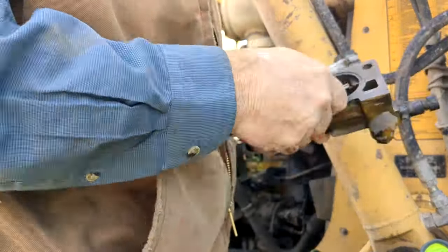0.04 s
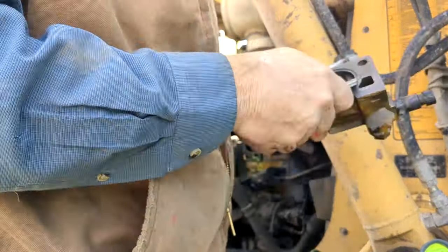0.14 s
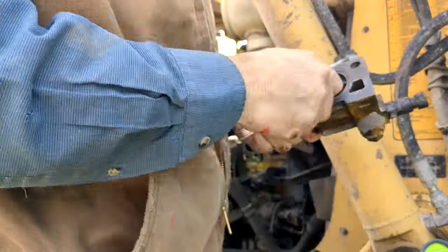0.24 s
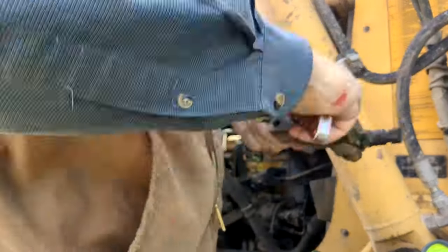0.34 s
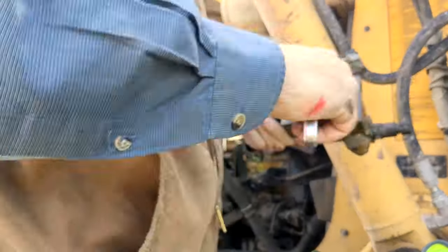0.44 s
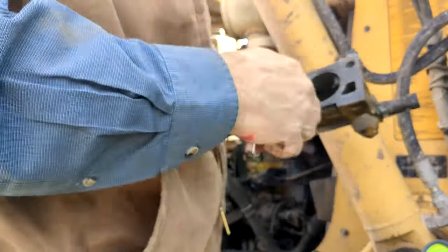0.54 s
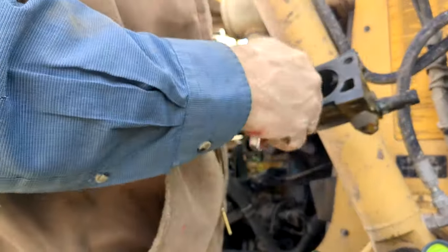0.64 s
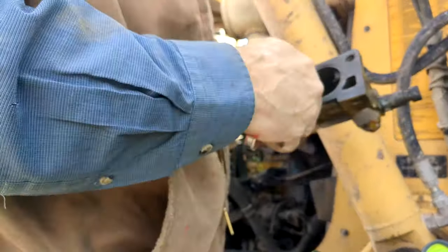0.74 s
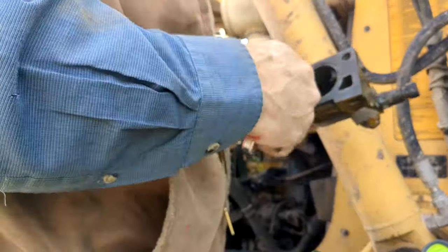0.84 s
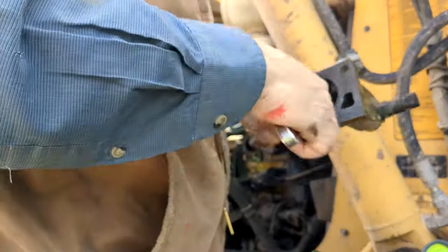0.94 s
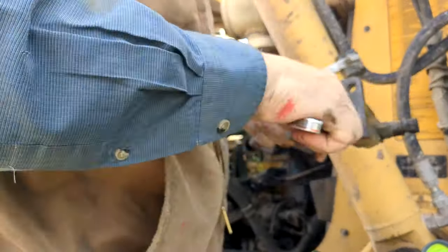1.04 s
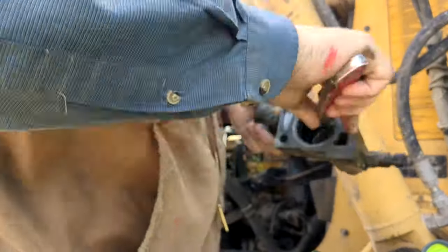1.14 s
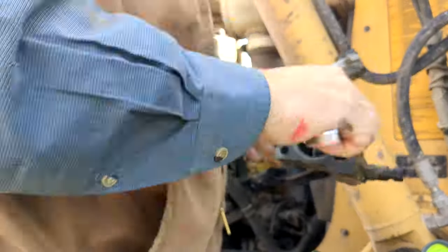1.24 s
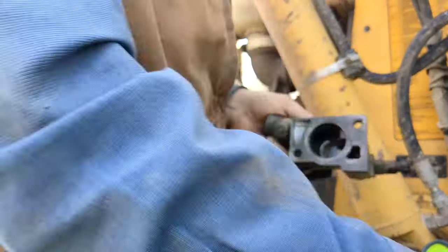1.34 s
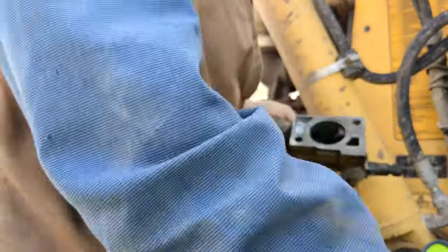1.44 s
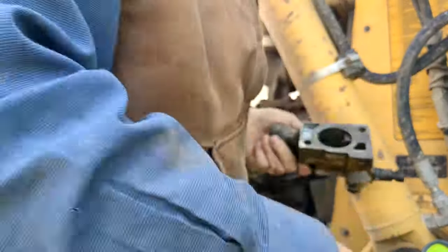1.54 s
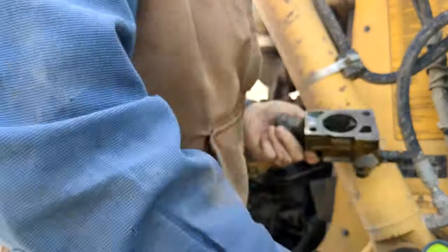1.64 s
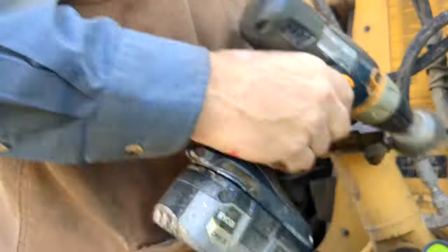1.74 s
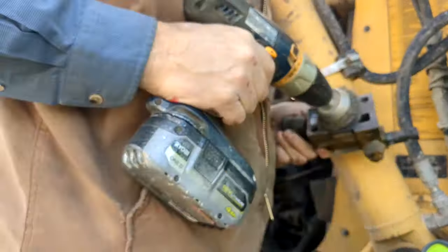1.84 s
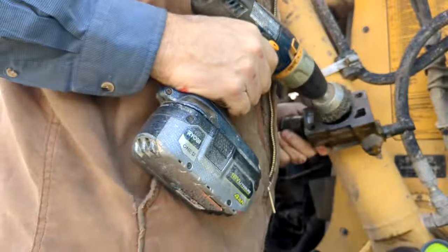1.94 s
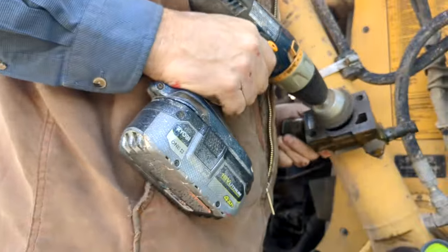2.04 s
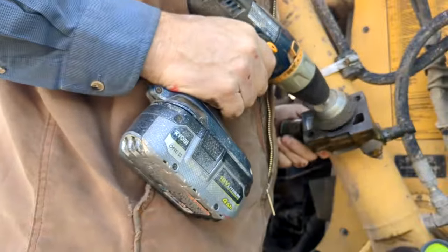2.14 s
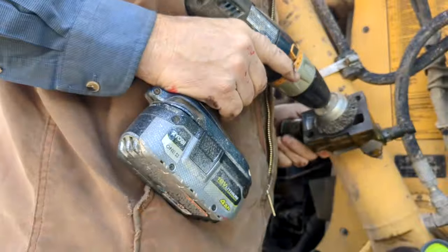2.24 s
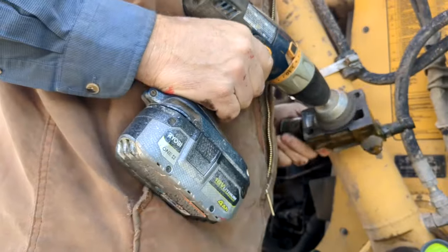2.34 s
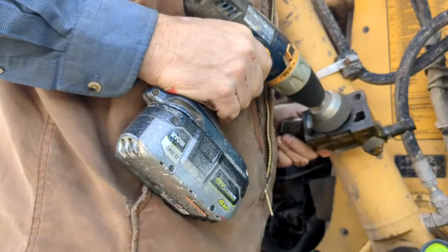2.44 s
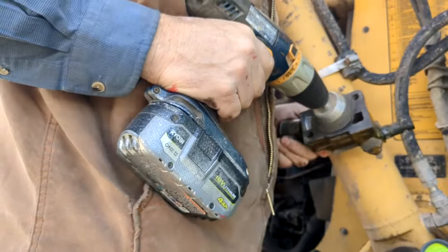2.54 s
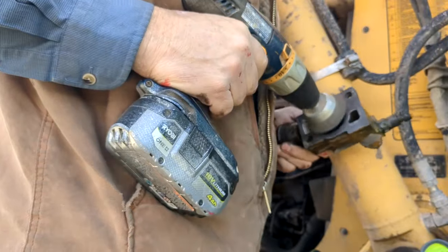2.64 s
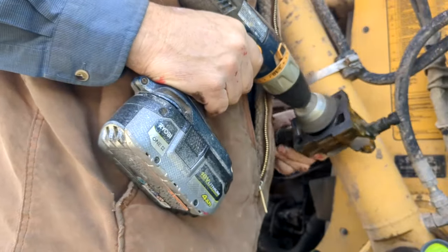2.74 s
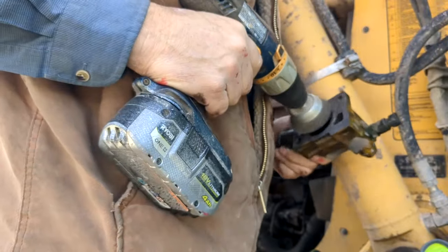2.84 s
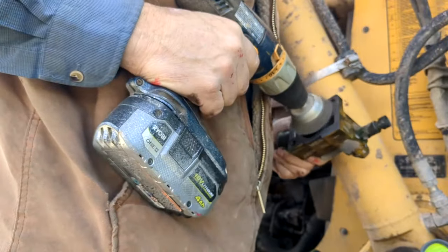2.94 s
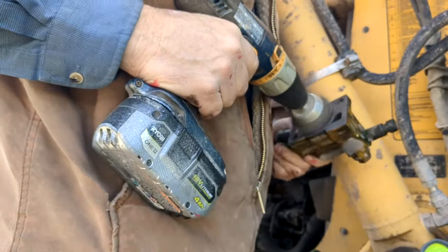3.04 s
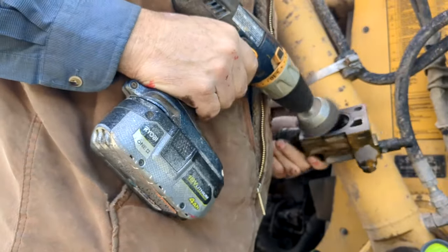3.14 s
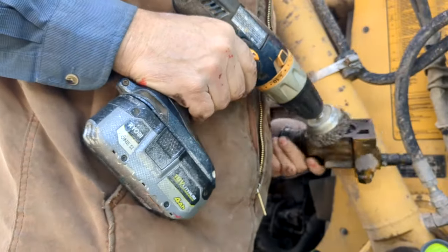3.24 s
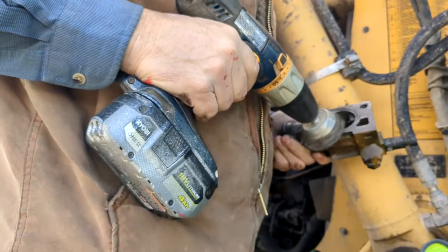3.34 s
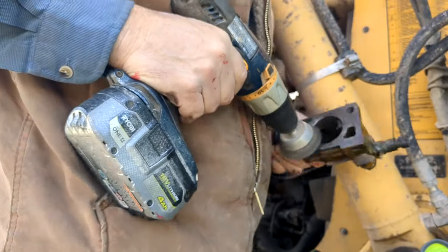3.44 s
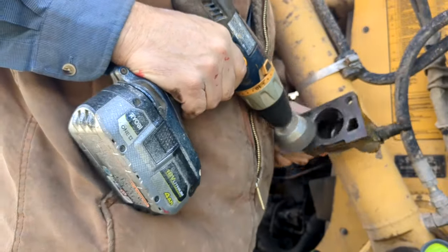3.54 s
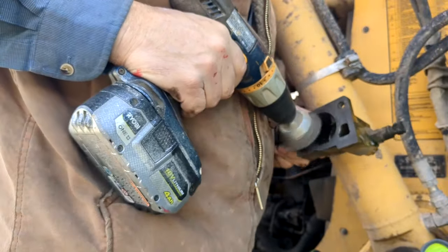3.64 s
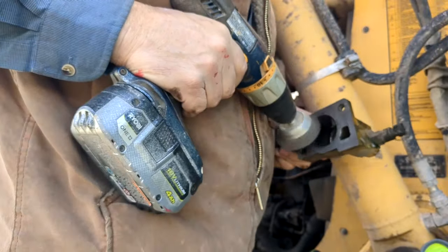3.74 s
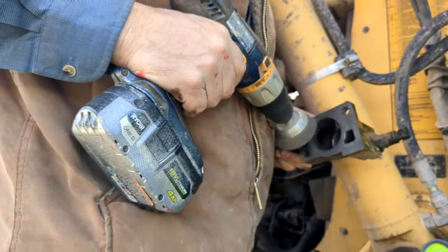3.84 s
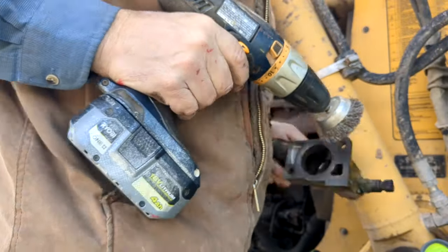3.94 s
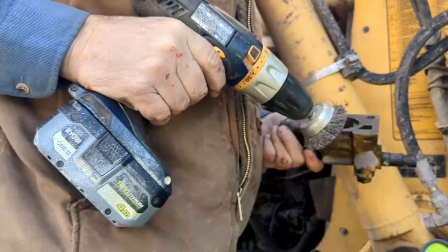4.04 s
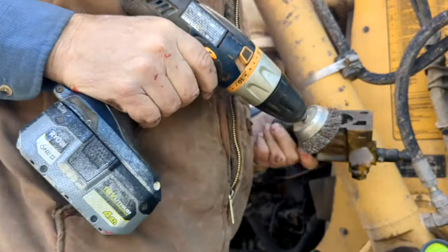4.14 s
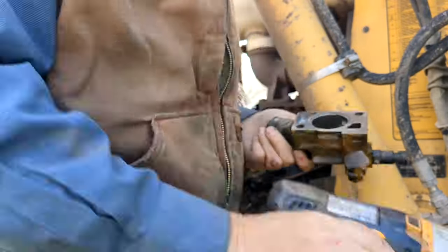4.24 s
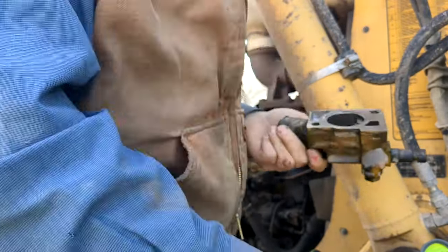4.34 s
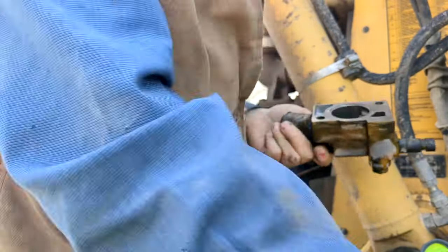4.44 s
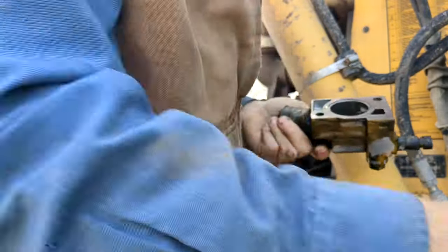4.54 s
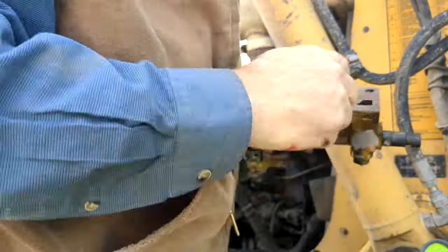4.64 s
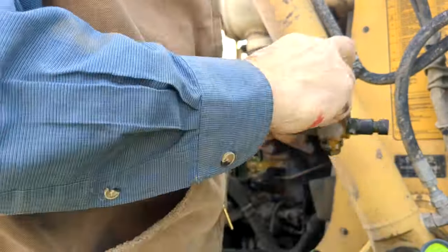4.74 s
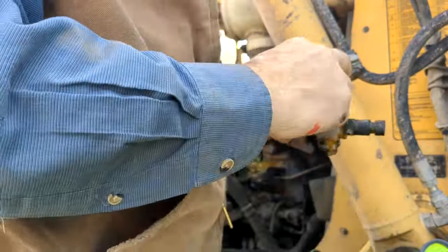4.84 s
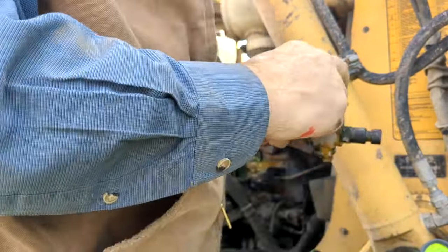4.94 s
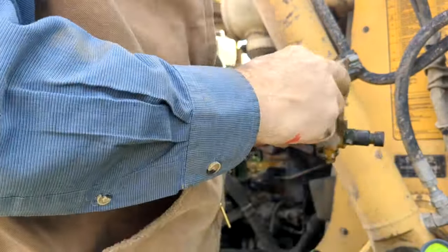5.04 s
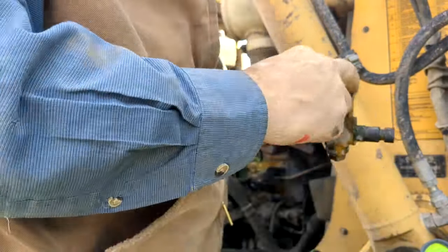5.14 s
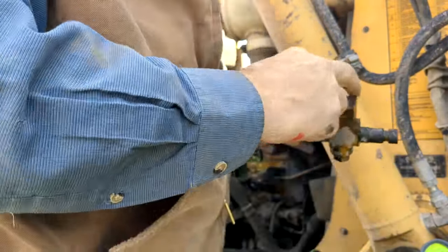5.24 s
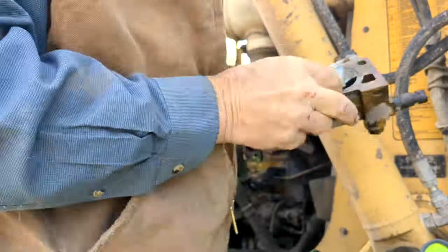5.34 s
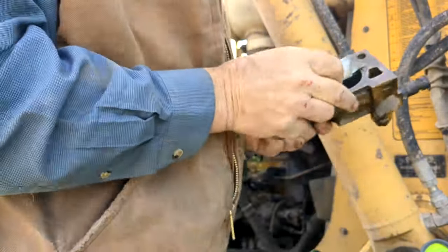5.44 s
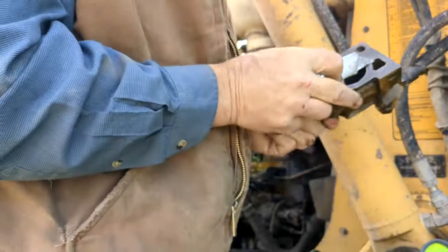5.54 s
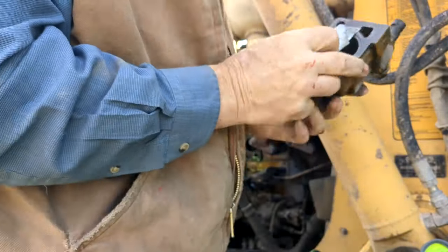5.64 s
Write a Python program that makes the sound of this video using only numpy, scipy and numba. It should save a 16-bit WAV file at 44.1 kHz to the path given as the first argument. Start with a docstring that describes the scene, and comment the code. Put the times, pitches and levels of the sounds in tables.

```python
"""A work spot open to the wind, a phone microphone close to the tool. A cordless drill spins a wire
cup brush against a cast metal part in three short bursts: the motor sings on multiples of its shaft
turn, the gears growl, the bristles rasp; brief thin tones sound, mostly in the first burst. Before
and after, hands knock and scrape tool and part. Underneath lie a low wavering hum, wind rumble,
cloth rustle and a thin hiss; three faint rising chirps come as the work ends."""
import sys
import numpy as np
from scipy import signal
from scipy.fft import rfft, irfft, next_fast_len
from scipy.io import wavfile
from scipy.ndimage import uniform_filter1d
from numba import njit

SR = 44100
rng = np.random.default_rng(int(sys.argv[2]) if len(sys.argv) > 2 else 0)


def master(y):
    """Save y as 16-bit WAV."""
    cut = np.clip(np.atleast_2d(y).T, -1, 1)
    pcm = np.round(cut * 32767)  # scale
    wavfile.write(sys.argv[1], SR, pcm.astype(np.int16))


N = 250488
T = np.arange(N) / SR


def undb(db):
    return 10 ** (np.asarray(db) / 20)


def unit(x):
    """Scale to rms 1."""
    return x / np.sqrt(np.mean(x ** 2))


def curves(rows):
    """The value columns of a (t/s, value, ..) table at every sample."""
    times, *columns = np.transpose(rows)
    return [np.interp(T, times, column) for column in columns]


def colour(x, spectrum):
    """Shape a signal by (f/Hz, level/dB) points; rms 1."""
    hz, db = np.transpose(spectrum)
    size = next_fast_len(len(x))
    log_hz = np.log(np.maximum(np.arange(size // 2 + 1) * SR / size, 1))
    gain = undb(np.interp(log_hz, np.log(hz), db, left=-80, right=-80))
    return unit(irfft(rfft(x, size) * gain, size)[:len(x)])


@njit
def bandpass(x, hz, width_hz):
    """Band-pass whose centre may move every sample, gain 1 at the centre."""
    y, band, low = np.empty(len(x)), 0., 0.
    for i in range(len(x)):
        g, damping = np.tan(np.pi * hz[i] / SR), width_hz / hz[i]
        v = (band + g * (x[i] - low)) / (1 + g * (g + damping))
        band, low, y[i] = 2 * v - band, low + 2 * g * v, damping * v
    return y


def wander(rate):
    """Random levels held 1 / rate s and smoothed twice; spread near 1."""
    hold = int(SR / rate)
    steps = np.repeat(rng.standard_normal(N // hold + 1), hold)
    return 1.395 * uniform_filter1d(uniform_filter1d(steps, hold), hold)[:N]


def grit(scatter_db):
    """Dense tiny impacts of uneven size."""
    return rng.standard_normal(N) * undb(scatter_db * np.minimum(rng.exponential(size=N), 4))


# Low hum at the microphone: t/s, level/dB
HUM_LEVEL = [(0.0, -60), (0.38, -73), (0.41, -59), (0.63, -75), (1.09, -72), (1.19, -55), (1.37, -80.5),
             (1.47, -45.5), (1.68, -73), (1.82, -78), (1.99, -40), (2.06, -37), (2.12, -34.5), (2.37, -36),
             (2.44, -42), (2.56, -58), (2.66, -35), (2.72, -44), (2.93, -48.5), (3.02, -34), (3.16, -59),
             (3.46, -48.5), (3.7, -51.5), (3.76, -62), (3.89, -42), (4.18, -62.5), (4.4, -47.5),
             (4.75, -66.5), (5.31, -66.5), (5.43, -34), (5.68, -33)]


def hum(hz=70.2):
    """One low tone that wavers in pitch and level."""
    phase = 2 * np.pi * np.cumsum(hz + 0.66 * wander(4.8)) / SR
    return np.sqrt(2) * np.sin(phase) * undb(curves(HUM_LEVEL)[0] + wander(12))


# Wind at the microphone: t/s, relative level/dB
WIND_LEVEL = [(0.0, -53), (0.17, -69), (0.6, -76), (1.1, -80), (1.19, -61), (1.37, -85), (1.47, -67),
              (1.6, -64), (1.82, -83), (2.06, -46.5), (2.99, -54.5), (3.015, -34.5), (3.04, -47),
              (3.3, -55.5), (3.55, -45.5), (3.76, -56), (3.89, -44.5), (4.1, -62), (4.4, -52), (4.7, -66.5),
              (4.75, -75.5), (5.31, -73), (5.43, -43), (5.68, -48)]
# Spectrum of its rumble: f/Hz, level/dB
WIND_SPECTRUM = [(15, -11.5), (30, 0.5), (50, 1.5), (120, 1), (220, -7.5), (400, -20), (700, -27)]


def wind():
    """Deep noise that swells unevenly with the gusts."""
    rumble = colour(rng.standard_normal(N), WIND_SPECTRUM)
    return rumble * undb(curves(WIND_LEVEL)[0] + 4 + 2.8 * wander(9.6))


# Cloth and fingers near the microphone: t/s, relative level/dB
CLOTH_LEVEL = [(0.0, -69.5), (0.6, -68.5), (0.95, -71.5), (1.3, -70), (1.85, -66.5), (2.2, -52.5),
               (2.33, -54), (3.26, -64.5), (3.35, -65), (3.97, -54.5), (4.45, -50), (4.76, -60),
               (4.79, -69.5), (4.941, -63.5), (5.0, -53), (5.1, -58.5), (5.17, -64.5), (5.34, -62.5),
               (5.54, -53.5), (5.68, -55)]
# Their spectra before the first burst and from then on: f/Hz, level/dB
EARLY_CLOTH_SPECTRUM = [(300, -30), (600, -15.5), (1200, -17), (1550, -6.5), (1850, 2), (2300, -10.5),
                        (3200, -11), (5000, -18.5), (7000, -27)]
LATE_CLOTH_SPECTRUM = [(300, -31.5), (550, -19.5), (800, -5), (1000, 1), (1500, 1.5), (2200, -2),
                       (3300, -6.5), (4500, -15), (7000, -33)]


def cloth(tone_hz=932):
    """Cloth and fingers rub in fine grains; a very faint tone rises and falls with them."""
    level_db = curves(CLOTH_LEVEL)[0]
    grains = grit(0.9)
    early, late = colour(grains, EARLY_CLOTH_SPECTRUM), colour(grains, LATE_CLOTH_SPECTRUM)
    rustle = np.where(T < DRILL_BURSTS[0][0], early, late) * undb(level_db + 1.5 + 2 * wander(45))
    tone = np.sqrt(2) * np.sin(2 * np.pi * tone_hz * T) * undb(-83 + .5 * (level_db + 65))
    return rustle + tone


# Background hiss: t/s, level/dB
HISS_LEVEL = [(0.0, -68.5), (0.5, -72.5), (0.75, -76), (1.2, -69.5), (3.3, -67.5), (4.45, -64.5),
              (4.9, -71), (5.68, -66.5)]
# Its spectrum: f/Hz, level/dB
HISS_SPECTRUM = [(3000, -25), (4000, -6), (5200, -8), (6800, 0), (8000, -9), (10000, -5), (13000, -12),
                 (16500, -18)]


def hiss():
    """Faint, grainy treble that flickers."""
    return colour(grit(2.5), HISS_SPECTRUM) * undb(curves(HISS_LEVEL)[0] + 1.4 * wander(40))


# Dull modes of the hand-held part and the drill body: f/Hz, level/dB, t60/s
BODY_MODES = [(230, -10, 0.029), (333, 0, 0.016), (410, 4, 0.0074), (683, -3.5, 0.018), (968, -16, 0.033)]
# Spectrum of the tick on contact: f/Hz, level/dB
TICK_SPECTRUM = [(4000, -24), (5000, 3.5), (6800, -2), (8200, -9), (10200, 3.5), (12500, -8), (16500, -1)]


def knock(start, db, ring_hz, fall_s, thud_db, tick_db, push_hz, rise_s=0.004):
    """One contact, a short swell of noise: a pitched ring, a thud in the body modes, a tick on top."""
    t = np.arange(3600) / SR
    ring_noise, push_noise, tick_noise = rng.standard_normal((3, len(t)))
    band = lambda x, hz, width_hz: bandpass(x, np.full(len(t), float(hz)), width_hz)
    to_peak = lambda x: x / np.max(np.abs(x))
    # a rounded swell with a weak tail from nearby steel
    rise = np.sin(np.pi / 2 * np.minimum(t / rise_s, 1)) ** 2
    age = np.maximum(t - rise_s, 0) / fall_s
    swell = rise * (np.exp(-age ** 2) + 0.029 * np.exp(-age / 2))
    scrape = ring_noise
    for _ in range(3):
        scrape = band(scrape, 2000, 2600.)
    ring = swell * (unit(scrape) + 2.8 * unit(band(ring_noise, ring_hz, 310.)))
    # the push has no steady part, so nothing booms below the body modes
    low_cut = signal.butter(2, 200, "high", fs=SR, output="sos")
    push = band(signal.sosfilt(low_cut, push_noise * swell), push_hz, 250.)
    body = sum(undb(level) * np.sin(2 * np.pi * hz * t) * 1000 ** (-t / t60)
               for hz, level, t60 in BODY_MODES)
    thud = signal.fftconvolve(push, body)[:len(t)]
    tick = swell * colour(tick_noise, TICK_SPECTRUM)
    contact = to_peak(ring) + undb(thud_db) * to_peak(thud) + undb(tick_db) * to_peak(tick)
    onset = int((start - .002) * SR)
    return np.pad(undb(db) * contact, (onset, N))[:N]


# Light handling, close up: t/s, ring level/dB, ring f/Hz, fall/s, tick re ring/dB
FINGER_CLICKS = [(0.2292, -45, 2220, 0.0035, -2), (0.245, -41.5, 2450, 0.0073, 7),
                 (0.253, -38, 2190, 0.0047, -5), (0.2875, -39, 1710, 0.0065, 3),
                 (0.317, -45, 1950, 0.0066, -13), (0.338, -36, 2900, 0.01, -4),
                 (0.377, -44, 3020, 0.0069, -6), (0.3865, -38, 3160, 0.018, -2),
                 (0.393, -41, 3140, 0.0089, -14), (0.4022, -30, 3230, 0.0075, -11),
                 (0.4138, -29.5, 3500, 0.0037, -15), (0.975, -40.5, 2640, 0.012, 2),
                 (1.017, -46.5, 2030, 0.0063, 5.5), (1.054, -47, 1910, .005, -4),
                 (1.077, -41.5, 2200, 0.014, -7), (1.09, -39.5, 2180, 0.0089, -4),
                 (1.114, -36, 2160, 0.0065, -1), (1.1187, -23.5, 2350, 0.0043, -4.5),
                 (1.1401, -23, 2370, 0.01, -3), (1.1539, -19, 3370, 0.017, -4),
                 (1.166, -15, 3300, 0.0052, -4.5), (1.263, -39, 2120, 0.0045, -2),
                 (1.4337, -20, 2400, 0.0078, -17), (1.608, -32, 1760, .0042, -40),
                 (1.635, -44, 1865, 0.0094, -22), (1.6788, -41, 1760, 0.0086, -10),
                 (1.695, -26.5, 2010, 0.007, -3), (1.7764, -56, 1870, 0.0071, 11.5),
                 (1.843, -44, 2370, 0.0053, 2.5), (1.877, -24, 3440, .0032, -20),
                 (2.227, -35.5, 2500, 0.0043, 2), (3.3413, -36, 2200, 0.0089, -10),
                 (4.14, -41.5, 2900, 0.0066, -28), (4.1796, -38.5, 1120, 0.0085, -22),
                 (4.504, -30, 1550, 0.0076, -14), (4.5394, -34, 2060, 0.006, -7),
                 (4.8531, -37, 1986, 0.0056, -32), (4.991, -40, 3760, .0052, -26),
                 (5.0336, -36.5, 2050, 0.0069, -8), (5.185, -42, 1760, .005, -12),
                 (5.218, -36, 2950, 0.0066, -1), (5.259, -41, 3510, .0056, -1),
                 (5.2731, -27, 3250, 0.0044, -10.5), (5.296, -46, 1600, .004, -9),
                 (5.3227, -43.5, 2020, 0.0063, -1.5), (5.378, -44.5, 2000, .005, -10),
                 (5.5358, -35.5, 3500, 0.004, -12), (5.6009, -33.5, 2350, .0062, -5),
                 (5.668, -35.5, 2500, 0.006, -9)]


def clicks():
    """Fingers and metal tap and scrape, barely stirring the body modes."""
    return sum(knock(start, db, hz, fall_s, thud_db=-23.5, tick_db=tick_db, push_hz=950)
               for start, db, hz, fall_s, tick_db in FINGER_CLICKS)


# Short thin tones, mostly during the first burst: t/s, length/s, f/Hz, level/dB
BRIEF_TONES = [(1.452, 0.0084, 5040, -32), (1.887, 0.017, 3600, -19.5), (1.888, .028, 4960, -29.5),
               (1.895, 0.019, 1880, -26), (1.897, 0.025, 1020, -32.5), (1.898, .016, 8100, -33),
               (1.942, 0.1, 6930, -33), (2.002, 0.041, 3650, -25), (2.003, 0.023, 1290, -27),
               (2.006, 0.019, 2090, -17.5), (2.065, 0.03, 6140, -23), (2.07, .03, 5020, -24),
               (2.071, 0.029, 2850, -14), (2.077, 0.013, 3700, -30), (2.11, 0.033, 4840, -25),
               (2.112, 0.021, 2680, -11.5), (2.115, .016, 1870, -15), (2.125, .039, 6250, -33),
               (4.379, 0.016, 11460, -28)]


def brief_tones():
    """Each tone swells and fades at a steady pitch, its level fluttering."""
    out = np.zeros(N)
    for start, length, hz, db in BRIEF_TONES:
        progress = np.clip((T - start) / length, 0, 1)
        out += undb(db) * np.sin(np.pi * progress ** 1.1) * np.sin(2 * np.pi * hz * T)
    return out * undb(2 * wander(90))


# Heavy handling, close up: t/s, ring level/dB, ring f/Hz, fall/s, thud re ring/dB, push f/Hz
DRILL_CLUNKS = [(1.4545, -16, 1290, 0.0071, 5.5, 390), (1.466, -30.5, 1360, 0.021, 7, 215),
                (1.4822, -21.5, 1370, .01, 12, 298), (1.499, -33.5, 902, 0.0077, -2, 258),
                (1.513, -37.5, 2570, 0.0032, 9.5, 275), (4.3134, -14, 1423, 0.0047, 1.5, 577),
                (4.3219, -16, 1050, 0.019, -1, 278), (4.34, -7, 1020, 0.007, -5, 980),
                (4.351, -23, 895, 0.007, 0, 515), (4.365, -19, 1030, 0.0098, 4, 1040),
                (4.3789, -20.5, 1000, 0.0083, 4.5, 570), (4.3878, -22, 1360, 0.0071, -6, 256),
                (4.4834, -25, 2410, 0.0052, -0.5, 490), (4.4929, -26, 1370, .0069, -13, 614),
                (4.5222, -30, 1060, 0.0084, -6, 291)]


def clunks():
    """The drill body thuds as it is picked up and laid down."""
    return sum(knock(start, db, hz, fall_s, thud_db, tick_db=-26, push_hz=push_hz)
               for start, db, hz, fall_s, thud_db, push_hz in DRILL_CLUNKS)


# Weaker motor tones: multiple of the shaft turn, level re shaft tone/dB, flutter/dB
SHAFT_OVERTONES = [(2, -4, 1.5), (3.07, -14, 4.0), (4.97, -8, 4.0), (7, -11, 4.0), (9.03, -11, 4.0)]
# Blurred upper tones at full speed: multiple of the shaft turn, level re slot whine/dB
UPPER_WHINE = [(18, -23), (26, -23), (28.6, -17), (29.17, -15)]


def motor(set_hz, hz, turn, pull_db, shaft_trim_db, overtone_trim_db):
    """The shaft sings with its overtones; the slots whine at 12 times its speed."""
    def tone(multiple, db, flutter_db):
        return np.sqrt(2) * undb(db + flutter_db * wander(70)) * np.sin(multiple * turn + multiple)

    def blur(multiple, width_hz):
        once = bandpass(rng.standard_normal(N), multiple * hz, width_hz)
        return unit(bandpass(once, multiple * hz, width_hz))

    # the tones sag as load slows the shaft; below the knee the shaft tone fades fast
    free_hz, knee_hz = 329, 291
    sag = 1 - np.exp(-np.maximum(free_hz - set_hz, 0) / 15)
    fade_db = 0.8 * np.maximum(knee_hz - set_hz, 0)
    shaft_db = -26.5 + shaft_trim_db - 1.5 * sag - fade_db + 0.12 * pull_db
    whine_db = -16.5 - 8 * sag + pull_db
    shaft = tone(1, shaft_db, flutter_db=1.9)
    for multiple, db, flutter_db in SHAFT_OVERTONES:
        shaft += tone(multiple, shaft_db + overtone_trim_db + db, flutter_db)
    full_speed = np.clip((hz - 315) / 8, 0, 1)
    upper = full_speed * sum(undb(db) * blur(multiple, 50.) for multiple, db in UPPER_WHINE)
    haze = undb(whine_db) * (undb(-11) * blur(12, 300.) + upper)
    return shaft + tone(12, whine_db, flutter_db=1.5) + haze


def gears(shaft_hz, multiple=5.44):
    """The gears growl in a gritty band that follows the shaft speed."""
    return unit(bandpass(grit(5.7), multiple * shaft_hz, 290.)) * undb(-6.5 + 2 * wander(90))


# Brush on the casting, close up; spectra of mid rasp, scratch and bristle sizzle: f/Hz, level/dB
RASP_SPECTRUM = [(100, -47.5), (200, -19), (400, -13), (800, -4.5), (1200, -0.5), (1650, 3.5), (2100, 1),
                 (2400, -13.5), (2800, -31)]
SCRATCH_SPECTRUM = [(1700, -33), (2000, -5.5), (2300, 0.5), (3000, 1), (3600, -3.5), (4200, -3),
                    (4900, -4.5), (5300, -20), (6000, -41.5)]
BRISTLE_SPECTRUM = [(4500, -44.5), (5100, -9.5), (5500, -10), (6500, -9), (8200, -14.5), (8900, -6),
                    (9400, -1.5), (10200, -3), (11100, -9), (11600, -12.5), (13000, -15), (14000, -16.5),
                    (14800, -14.5), (15250, -13), (15600, -2.5), (16500, -12)]
# Brief dips in the rasp: t/s, level/dB
RASP_DIPS = [(1.906, -14), (2.016, -11), (2.081, -9), (2.123, -9), (2.63, -5), (3.762, -5)]


def wire_brush(turn, growl, brush_db, rasp_trim_db, planet_multiple=.571, dip_s=.015):
    """Wire tips strike the casting in three bands of grit; the gear growl rides in the rasp."""
    rasp = colour(grit(2.7), RASP_SPECTRUM) * undb(wander(150))
    rasp = (rasp + growl) * undb(brush_db - 4.5 + rasp_trim_db)
    scratch = colour(grit(1.3), SCRATCH_SPECTRUM) * undb(brush_db - 3.5 + 0.5 * wander(85))
    bristles = colour(grit(2.6), BRISTLE_SPECTRUM) * undb(brush_db - 7.5 + wander(71))
    # planet wheels passing the ring gear throb through the rasp
    throb = np.exp(0.13 * np.sin(planet_multiple * turn) + 0.09 * np.sin(turn))
    dip_db = sum(db * np.exp(-((T - centre) / (dip_s / 2)) ** 4) for centre, db in RASP_DIPS)
    return undb(dip_db) * (rasp + scratch) * throb + undb(0.39 * dip_db) * bristles


# The three bursts: from t/s, to t/s, rasp trim/dB, shaft tone trim/dB, overtone trim/dB
DRILL_BURSTS = [(1.882, 2.24, -2.5, 2.5, -3), (2.33, 3.25, 0.5, -1.2, 1), (3.358, 3.976, 0.5, 1.1, -4)]
# Motor shaft, one list a burst: t/s, turning f/Hz, pull re full pull/dB
SHAFT_SPEED = [
    [(1.87, 199.8, -35), (2.03, 225.5, -34.5), (2.06, 302, -24), (2.12, 312, -31), (2.17, 309, -22.5),
     (2.2, 245, -34.5), (2.215, 224, -49)],
    [(2.33, 223.5, -16), (2.342, 254.2, -8), (2.365, 316.8, 2), (2.38, 327.5, -1), (2.5, 327.7, -3.5),
     (2.58, 320.7, -5), (2.7, 329.5, -1), (3.1, 324.9, -0.5), (3.18, 331.7, 0), (3.2, 303.6, -0.5),
     (3.218, 242.6, 6), (3.23, 226, -20)],
    [(3.37, 254.5, -24.5), (3.405, 290.3, -2.5), (3.43, 290, -4), (3.44, 267.6, 2), (3.457, 269, 2.5),
     (3.468, 303.8, 0.5), (3.482, 327.6, 2.5), (3.5, 328.1, 4.5), (3.565, 323.4, 2), (3.65, 328.4, 1),
     (3.89, 326.7, 1), (3.905, 321.2, -5), (3.925, 319.4, 3), (3.94, 304.3, -37), (3.96, 268.4, -48)],
]
# Brush on the metal, one list a burst: t/s, relative level/dB
BRUSH_LEVEL = [
    [(1.868, -73), (1.874, -49), (1.882, -22.5), (1.897, -20.5), (1.925, -19.5), (2.03, -19.5),
     (2.045, -15), (2.082, -13), (2.198, -13.5), (2.22, -51), (2.23, -45), (2.245, -62)],
    [(2.325, -65.5), (2.337, -25), (2.35, -17.5), (2.363, -12.5), (2.4, -14), (2.631, -13), (3.181, -13),
     (3.219, -19.5), (3.233, -45.5), (3.25, -69)],
    [(3.358, -67), (3.37, -21), (3.39, -20), (3.4, -11), (3.436, -15), (3.478, -13), (3.918, -12.5),
     (3.93, -16.5), (3.946, -17.5), (3.962, -50), (3.975, -51)],
]


def drill(stall_db=-19.5):
    """One shaft drives motor tones, gears and brush; below stall_db the tones die with the brush."""
    set_hz, pull_db = curves(np.concatenate(SHAFT_SPEED))
    brush_db = curves(np.concatenate(BRUSH_LEVEL))[0]
    in_burst = np.array([(T >= start) & (T <= end) for start, end, *_ in DRILL_BURSTS], float)
    running = uniform_filter1d(in_burst.sum(axis=0), size=220)
    rasp_trim_db, shaft_trim_db, overtone_trim_db = np.array(DRILL_BURSTS)[:, 2:].T @ in_burst
    hz = set_hz * (1 + 0.0027 * wander(40))  # the load on the brush makes the speed tremble
    turn = 2 * np.pi * np.cumsum(hz) / SR
    tones = motor(set_hz, hz, turn, pull_db, shaft_trim_db, overtone_trim_db)
    tones *= undb(np.minimum(brush_db - stall_db, 0))
    return running * (tones + wire_brush(turn, gears(hz), brush_db, rasp_trim_db))


# Faint chirps in the background: t/s, length/s, from f/Hz, to f/Hz, level/dB
RISING_CHIRPS = [(3.97, .03, 2600, 3150, -45), (4.055, .025, 3600, 4300, -51),
                 (4.735, .04, 2300, 3000, -52)]


def chirps():
    """Short whistles that glide upward."""
    out = np.zeros(N)
    for start, length, from_hz, to_hz, db in RISING_CHIRPS:
        progress = np.clip((T - start) / length, 0, 1)
        hz = from_hz + (to_hz - from_hz) * progress
        out += undb(db) * np.sin(np.pi * progress) * np.sin(2 * np.pi * np.cumsum(hz) / SR)
    return out


def scene():
    """All that reaches the one microphone beside the work."""
    background = hum() + wind() + cloth() + hiss()
    return (background + clicks() + brief_tones() + clunks() + drill() + chirps())[None]


def record(dry, top_hz=15700):
    """The phone, close to the tool, rounds the loudest peaks and cuts the top."""
    rounded = np.tanh(.95 * dry) / .95
    return signal.sosfilt(signal.ellip(14, .3, 90, top_hz, fs=SR, output="sos"), rounded)


dry = scene()
out = record(dry)
master(out)
```